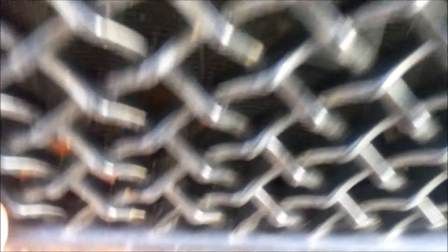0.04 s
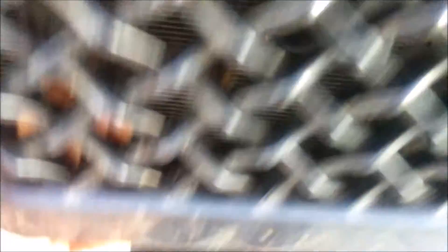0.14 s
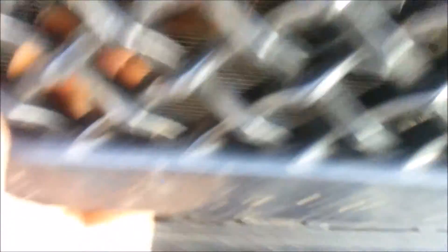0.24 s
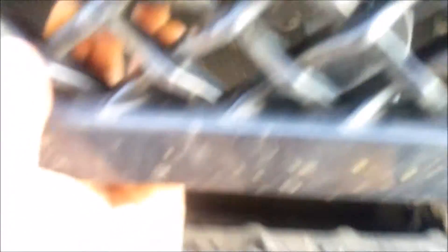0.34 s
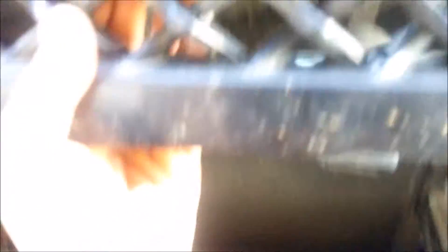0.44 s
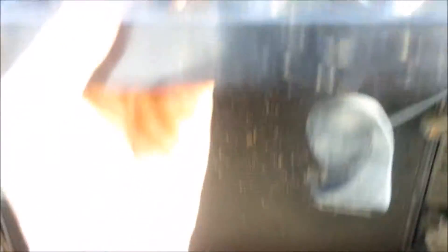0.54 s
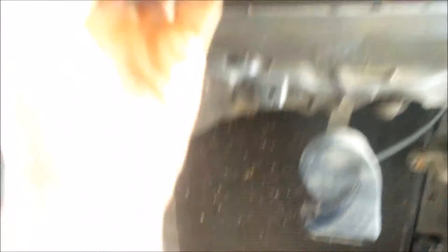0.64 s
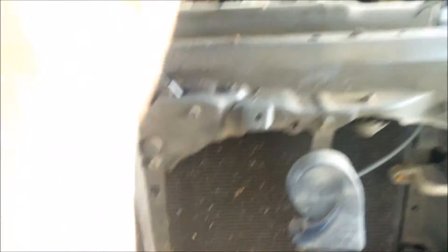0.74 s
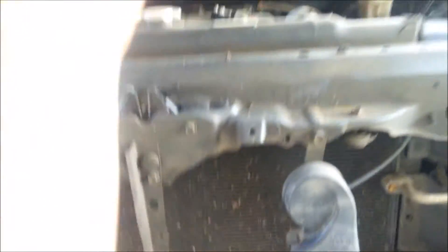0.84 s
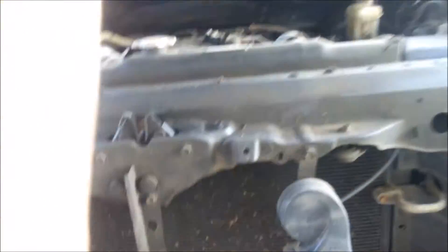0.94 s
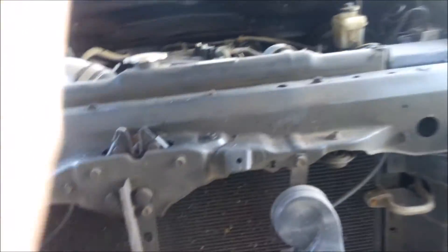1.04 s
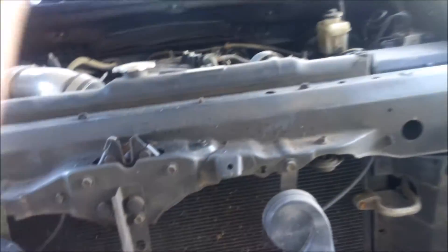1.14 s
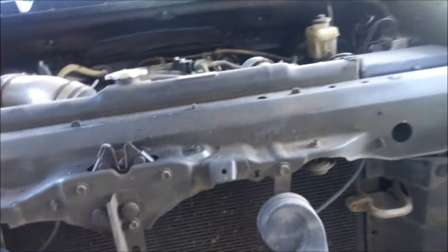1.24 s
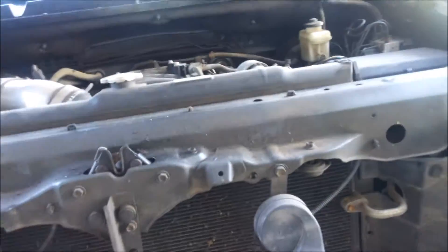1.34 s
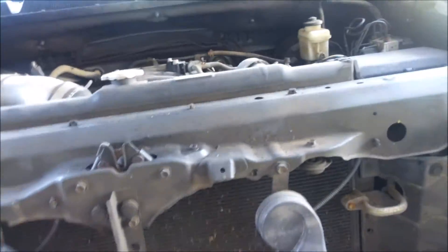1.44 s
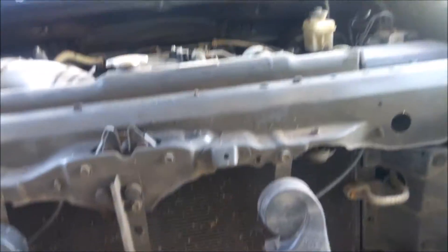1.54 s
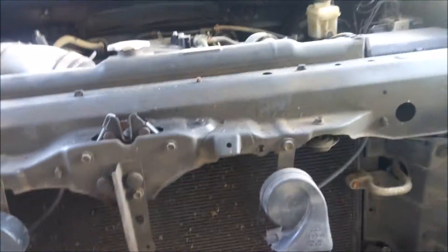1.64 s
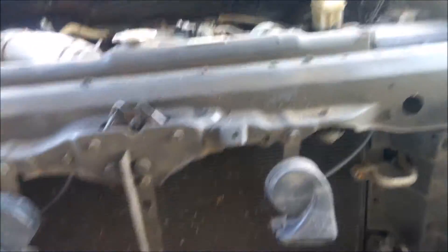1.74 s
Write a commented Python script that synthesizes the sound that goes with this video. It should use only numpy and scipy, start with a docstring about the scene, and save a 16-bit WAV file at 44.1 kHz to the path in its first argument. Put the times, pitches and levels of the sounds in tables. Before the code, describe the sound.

A pickup hood is opened, heard very close in stereo outdoors. Light catch ticks and rattles at 0.06-0.18 seconds lead to a loud, booming, clanking cluster at 0.23-0.32, its steel ring dying quickly. Much quieter dry scraping, thin squeaks and small knocks follow from 0.5 to 0.9. Soft creaks come near 1.2 and 1.4, then it settles into faint low air by 1.8.

```python
"""A pickup hood is unlatched and lifted outdoors, heard from close by at the grille, over faint open air.
First the safety catch ticks and rattles; then the hood jolts free with a booming clunk.
Hinges and struts scrape, squeak and hiss as it rises, with smaller knocks; it creaks twice more and settles.
Blows and rubbing are shaped noise, the steel's clear notes are ringing filters set off by uneven clicks,
and squeaks are rough gliding tones."""
import sys
import numpy as np
from scipy import signal
from scipy.io import wavfile

SR = 44100
rng = np.random.default_rng(int(sys.argv[2]) if len(sys.argv) > 2 else 0)


def unload_wav(signal):
    """Save mono or channel-first audio to the path in sys.argv[1] as 16-bit WAV at rate SR, clipped to [-1, 1]."""
    wavfile.write(
        sys.argv[1],
        SR,
        np.round(np.clip(np.atleast_2d(signal).T, -1, 1) * 32767).astype(np.int16),
    )


N = 79380  # samples, 1.8 s

# All levels in the tables are relative: the layers are balanced further below.
# Blows of catch and hood:
# (time [s], panel boom [dB], clank [dB], sizzle [dB], chatter length [s], at least 0.001)
BLOWS = [(0.057, -79, -54, -59, 0.0024), (0.072, -64, -44, -38, 0.0043), (0.089, -51, -24.5, -26.5, 0.014),
         (0.118, -28.5, -45, -23.5, 0.005), (0.1255, -49, -22, -26.5, 0.0083),
         (0.17, -39, -34, -32.5, 0.008), (0.18, -30, -43, -42, 0.0085), (0.2272, -14, -7.5, -15, .012),
         (0.24, -14.5, -16.5, -23.5, 0.033), (0.28, -15.5, -13.5, -25, 0.011),
         (0.295, -16, -19.5, -20, 0.018), (0.302, -10.5, -28, -38.5, 0.024),
         (0.567, -42.5, -30, -30, 0.0017), (0.58, -29, -31.5, -49, 0.0035), (0.612, -37, -37.5, -39, 0.014),
         (0.699, -64, -28.5, -43, 0.0096), (0.74, -58, -34, -42, 0.018), (.828, -59, -33, -51, 0.0095),
         (0.954, -54.5, -43, -69, 0.0034), (1.039, -62, -48, -74, 0.008)]
# Rubbing of catch, hinges and struts: (time [s], panel boom [dB], clank [dB], sizzle [dB])
RUBBING = [(0, -62, -67, -76), (.07, -93, -90, -80), (.095, -33, -57, -38.5), (.2, -38, -41.5, -41.5),
           (.33, -54, -22, -43), (.38, -23.5, -52.5, -45.5), (.47, -45.5, -53, -47), (.49, -46, -48, -46),
           (.525, -50, -37, -33), (.56, -52, -46, -40), (.62, -41, -39.5, -40.5), (.78, -46.5, -41, -43),
           (.86, -44.5, -45, -42.5), (.905, -43.5, -49.5, -42), (.92, -54.5, -56, -51),
           (1.174, -56, -62, -51), (1.177, -58, -44, -49), (1.205, -50, -51, -50), (1.225, -40, -44, -47),
           (1.275, -43, -54, -44), (1.295, -55, -63, -51), (1.36, -47.5, -57, -51), (1.405, -39, -39, -47),
           (1.45, -37, -47.5, -40.5), (1.485, -48, -50.5, -43.5), (1.51, -49, -57.5, -50),
           (1.59, -62, -61, -48.5), (1.68, -54, -63.5, -51), (1.8, -53, -56.5, -62)]
# Middles of the three pitch ranges, boom, clank and sizzle: (frequency [Hz])
RANGE_HZ = [300, 1400, 6000]
# Broad colour of the struck steel: (frequency [Hz], level [dB per Hz])
STEEL_COLOUR = [(40, -29), (183, -15), (235, -14), (325, -4), (704, -12), (1080, -11), (1560, -13),
                (2010, -9), (3470, -21.5), (4570, -19.5), (9180, -29.5), (15500, -69.5)]
# Colour of the rubbing noise: (frequency [Hz], level [dB per Hz])
RUB_COLOUR = [(40, -47), (140, -10.5), (220, -2), (330, 4), (440, 5.5), (650, -19), (830, -12), (1120, -6),
              (1600, -20), (2200, -10), (3800, -28), (5500, -18), (7000, -26.5), (8900, -23),
              (11500, -27.5), (15500, -52)]
# Basic time for each band to die by 60 dB, shortened by the shares below: (frequency [Hz], time [s])
DYING = [(60, 1), (300, 0.46), (700, 0.31), (1500, 0.36), (3000, 0.18), (6000, 0.12), (12000, 0.078)]
# Clear notes of panel and latch; the 60 dB ring time is shortened by a share:
# (frequency [Hz], level [dB], ring time [s])
PANEL_NOTES = [(65, -16, 0.3), (100.8, -13, 0.25), (126.3, -12, 0.2), (187.9, -7, 0.22), (268.6, -8, 0.1),
               (326, -5, 0.1), (367, -5, 0.1), (422, -13, 0.067), (460.4, -11, 0.5), (498.8, -7, 0.12),
               (639.5, -8, 0.091), (1099.5, -9, 0.088), (1287, -11, 0.092), (2058, -10, 0.028),
               (2354, -7, 0.02)]
# Dry squeaks and groans of catch, hinges and struts:
# (time [s], length [s], start pitch [Hz], end pitch [Hz], level [dB])
SQUEAKS = [(.208, .022, 4480, 4500, -37), (.512, .03, 5300, 5000, -40), (.52, .07, 3400, 3330, -43),
           (.635, .05, 2880, 2850, -42), (.705, .05, 2450, 2650, -44), (.745, .05, 3000, 3150, -43),
           (.795, .05, 3450, 3300, -42), (.84, .045, 3150, 3000, -42.5), (.98, .19, 1130, 1120, -53.5),
           (1.03, .07, 5850, 5830, -57), (1.172, .1, 1090, 990, -47), (1.21, .075, 8500, 8700, -47),
           (1.21, .07, 5900, 5500, -48), (1.24, .05, 5050, 4600, -46), (1.36, .11, 1100, 1120, -46),
           (1.395, .105, 815, 795, -41), (1.54, .08, 8400, 8900, -52), (1.59, .13, 450, 440, -52.5),
           (1.19, .1, 120, 190, -47)]
# How alike left and right are, 1 = the same: (frequency [Hz], likeness [0 to 1])
LIKENESS = [(60, 0.85), (180, 1), (550, 0.89), (1000, 0.4), (4970, 0.02), (15000, 0.21)]
# How much louder left is than right: (frequency [Hz], left minus right [dB])
LEAN = [(60, 2), (180, 2.5), (550, 1), (1650, -2.5), (4970, -7), (15000, -3)]
# Colour of the open-air background: (frequency [Hz], level [dB per Hz])
AIR_COLOUR = [(30, -4), (169, -7), (246, -7.5), (329, -26), (410, -15), (683, -22.5), (6000, -27),
              (7800, -78)]

AIR_DB = -62  # overall level of the background
LIFT_S = .45  # blows from this time on strike the gripped hood
# steel noise: overall level, click level against the hiss, shares of the dying time
STEEL_NOISE_DB, CLATTER_DB = -2, -6
QUICK_SHARE, TAIL_POWER = .25, .35  # most of a free blow dies fast, the rest rings on
HELD_SHARE = .2  # a gripped hood rings this much of the full time
# clear notes: levels for free and gripped blows, share of the ring time when free
FREE_RING_DB, HELD_RING_DB, FREE_SHARE = -.5, -10, .73
KNOCK_DB = 2
GRAINS_PER_S, GRAIN_SPREAD_DB = 2500, 3.0  # clicks that excite the notes; unevenness of all clicks
GRIT_PER_S, GRIT_DB = 300, -10  # clicks inside the noises; their level in the rubbing
PATCHY_DB = 2.2  # wavering of the rubbing
SQUEAK_FLUTTER_DB = 3.5
ROUGH_HZ, ROUGH_SHARE = 10, .022  # pitch roughness: a fixed part plus a share of the start pitch
MIC_LOW_HZ, CUTOFF_HZ = 46, 16000
CEILING = .92  # of full scale; peaks are rounded towards this before the top is cut


def from_db(db):
    """Turn decibels into a gain."""
    return 10 ** (np.asarray(db) / 20)


def rms_one(x):
    """Scale a signal to an average strength (rms) of 1."""
    return x / np.sqrt(np.mean(x ** 2) + 1e-20)


def in_time(rows):
    """Draw straight lines between table rows, one curve for each column after the time."""
    seconds, *columns = np.transpose(rows)
    return np.array([np.interp(np.arange(N) / SR, seconds, column) for column in columns])


def at_hz(points, hz):
    """Read a table at any frequency, evenly along the musical pitch scale."""
    table = np.array(points)
    return np.interp(np.log(hz), np.log(table[:, 0]), table[:, 1])


def drift(rate):
    """Random wandering of rms 1, smoothed above about `rate` Hz; made at every 40th sample."""
    r = np.exp(-80 * np.pi * rate / SR)
    noise = rng.standard_normal(N // 40 + 2002)
    slow = signal.lfilter([1], [1, -2 * r, r * r], noise)[2000:]
    return np.interp(np.arange(N) / 40, np.arange(len(slow)), rms_one(slow))


def grains(per_s):
    """Two random trains of uneven clicks, each up or down, together of rms 1."""
    size_db = GRAIN_SPREAD_DB * np.minimum(rng.exponential(1, (2, N)), 5)
    sizes = from_db(size_db) * rng.choice([-1, 1], (2, N))
    return rms_one(sizes * (rng.random((2, N)) < per_s / SR))


def to_sides(mid, side, hz):
    """Mix a shared and a differing signal into left and right with the likeness and lean at hz."""
    opposite = np.array([[1], [-1]])
    alike = np.clip(at_hz(LIKENESS, hz), 0, 1)
    lean = from_db(at_hz(LEAN, hz) / 2 * opposite)
    return lean * (np.sqrt(1 + alike) * mid + np.sqrt(1 - alike) * side * opposite) / np.sqrt(2)


def bands(spectrum, grit=0):
    """Steep third-octave stereo noise bands, coloured; gives each centre and signal."""
    edges = 35 * 2 ** (np.arange(28) / 3)
    white = rng.standard_normal((2, 2, N)) + grit
    for k, (low, high) in enumerate(zip(edges, edges[1:])):
        band = signal.butter(3, [low, high], "band", fs=SR, output="sos")
        mid, side = signal.sosfilt(band, white[k % 2])  # neighbouring bands use different noise
        hz = np.sqrt(low * high)
        yield hz, from_db(at_hz(spectrum, hz)) * to_sides(mid, side, hz)


def range_scale(hz, power):
    """Gain that brings the parts falling in each range to unit total power."""
    part = np.digitize(hz, [650, 2750])
    return 1 / np.sqrt(np.bincount(part, power, 3)[part])


def scaled_bands(spectrum, grit=0):
    """Noise bands with unit power in each of the three ranges."""
    parts = list(bands(spectrum, grit))
    scale = range_scale([hz for hz, _ in parts], [np.mean(x ** 2) for _, x in parts])
    return [(hz, gain * x) for (hz, x), gain in zip(parts, scale)]


def range_at(power, hz):
    """Blend the powers of the three ranges, in dB, at one frequency."""
    place = np.interp(np.log(hz), np.log(RANGE_HZ), [0, 1, 2])
    weights = np.clip(1 - np.abs(place - np.arange(3)), 0, 1)
    return np.exp(weights @ np.log(power + 1e-12))


def blow_power(blows):
    """Power of the blows in the three ranges: each rises in half a millisecond and chatters on."""
    power, t = np.zeros((3, N)), np.arange(N) / SR
    for start, *dbs, length in blows:
        rise = np.clip((t - start) / .0005, 0, 1)
        fall = np.clip((start + max(length, .001) - t) / .001, 0, 1)
        power += from_db(dbs)[:, None] ** 2 * rise * fall
    return power


def dying(power, t60):
    """Jumps up with the power, then falls 60 dB in t60 seconds, as ringing steel does."""
    slope = 6 * np.log(10) / (t60 * SR) * np.arange(N)
    # adding the slope turns a steady fall into a simple "highest so far"
    return np.exp(np.maximum.accumulate(np.log(power) + slope) - slope)


def open_air():
    """Faint steady background: coloured noise without any blows."""
    return from_db(AIR_DB) * rms_one(sum(x for _, x in bands(AIR_COLOUR)))


def squeak():
    """Dry joints sing: rough gliding near-sines that swell and fade."""
    out, t = 0, np.arange(N) / SR
    for start, length, start_hz, end_hz, db in SQUEAKS:
        along = np.clip((t - start) / length, 0, 1)
        roughness = (ROUGH_HZ + ROUGH_SHARE * start_hz) * drift(500)
        hz = start_hz + (end_hz - start_hz) * along + roughness
        swell = np.sqrt(np.sin(np.pi * np.sqrt(along)).clip(0))
        tone = swell * np.sin(2 * np.pi * np.cumsum(hz) / SR)
        level = from_db(db + SQUEAK_FLUTTER_DB * drift(80))
        out = out + level * to_sides(tone, np.roll(tone, -3), start_hz)
    return out


def rasp(rub):
    """Friction: patchy, gritty noise that follows the power of the rubbing."""
    together, out = drift(20.0), 0
    for hz, x in scaled_bands(RUB_COLOUR, from_db(GRIT_DB) * grains(GRIT_PER_S)):
        patches = from_db(PATCHY_DB * (0.3 * together + drift(28.4)))
        out = out + x * np.sqrt(range_at(rub, hz)) * patches
    return out


def knocks():
    """Each blow on the gripped hood sets off one dull push and one dry tick, both short rings."""
    out = 0
    # BLOWS column, pitch [Hz], a quarter of the cycles it takes to fall 60 dB
    for column, hz, cycles in ((1, 343, 2.3), (2, 1480, 8.8)):
        clicks = np.zeros(N)
        for blow in BLOWS:
            if blow[0] >= LIFT_S:
                clicks[int(blow[0] * SR)] = from_db(blow[column] + KNOCK_DB)
        r, w = from_db(-60 * hz / (4 * cycles * SR)), 2 * np.pi * hz / SR
        ring = signal.lfilter([0, np.sin(w)], [1, -2 * r * np.cos(w), r * r], clicks + 1e-18)
        out = out + to_sides(ring, np.roll(ring, -8), hz)
    return out


def steel_modes(contact, share):
    """Uneven chatter under the blows sets the clear notes ringing for a share of their full time."""
    chatter, out = grains(GRAINS_PER_S), 0
    for hz, db, t60 in PANEL_NOTES:
        r, w = from_db(-60 / (share * t60 * SR)), 2 * np.pi * hz / SR
        # each note gets the same clicks shifted round by a random amount
        drive = np.roll(chatter, rng.integers(N), axis=1) * np.sqrt(range_at(contact, hz))
        strength = np.sin(w) * np.sqrt(2 * (1 - r * r))
        mid, side = signal.lfilter([0, strength], [1, -2 * r * np.cos(w), r * r], drive)
        out = out + from_db(db) * to_sides(mid, side, hz)
    return out


def steel_noise(free, held):
    """The sheet's crowded notes: noise whose bands jump with each blow and die at their own pace."""
    out = 0
    for hz, x in scaled_bands(STEEL_COLOUR, from_db(CLATTER_DB) * grains(GRIT_PER_S)):
        t60 = at_hz(DYING, hz)
        free_here, held_here = range_at(free, hz), range_at(held, hz)
        quick = dying(free_here, QUICK_SHARE * t60)
        tail = TAIL_POWER * dying(free_here, t60)
        gripped = dying(held_here, HELD_SHARE * t60)
        out = out + x * np.sqrt(quick + tail + gripped)
    return from_db(STEEL_NOISE_DB) * out


def scene():
    """Add the shaken steel, air, rubbing, knocks and squeaks."""
    free = blow_power([blow for blow in BLOWS if blow[0] < LIFT_S])
    held = blow_power([blow for blow in BLOWS if blow[0] >= LIFT_S])
    rub = from_db(in_time(RUBBING)) ** 2
    free_rings = from_db(FREE_RING_DB) * steel_modes(free, FREE_SHARE)
    held_rings = from_db(HELD_RING_DB) * steel_modes(held, HELD_SHARE)
    rings = free_rings + held_rings
    air = open_air()
    return steel_noise(free, held) + rasp(rub) + rings + knocks() + squeak() + air


def record(dry):
    """The microphone drops the deepest bass, peaks are rounded, the top is cut."""
    low_cut = signal.butter(2, MIC_LOW_HZ, "high", fs=SR, output="sos")
    top_cut = signal.cheby2(16, 70, CUTOFF_HZ, fs=SR, output="sos")
    rounded = CEILING * np.tanh(signal.sosfilt(low_cut, dry) / CEILING)
    return signal.sosfilt(top_cut, rounded)


dry = scene()
out = record(dry)
unload_wav(out)
```